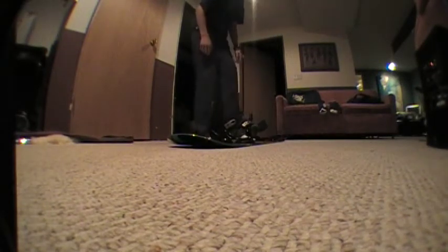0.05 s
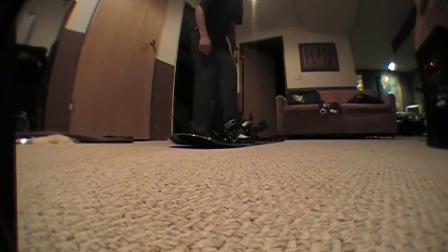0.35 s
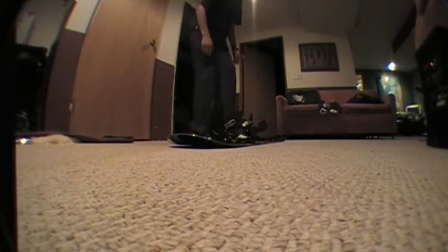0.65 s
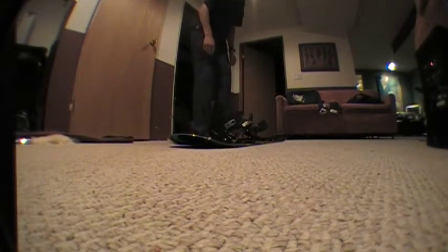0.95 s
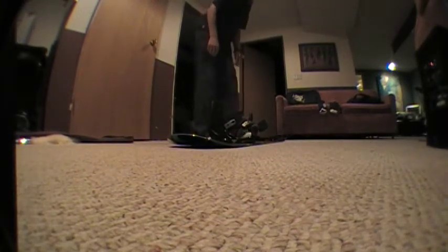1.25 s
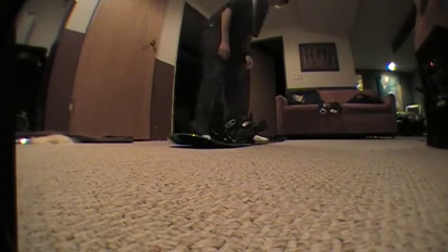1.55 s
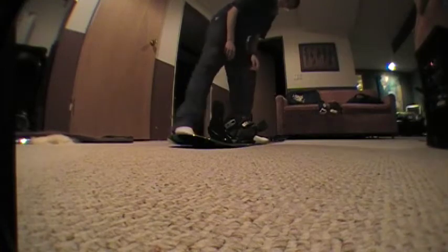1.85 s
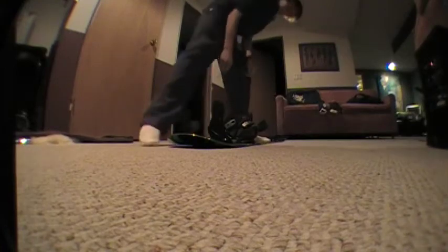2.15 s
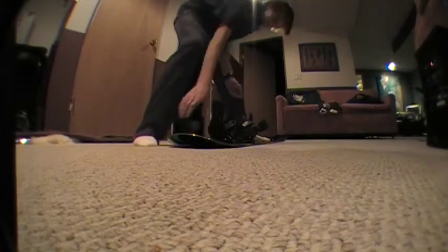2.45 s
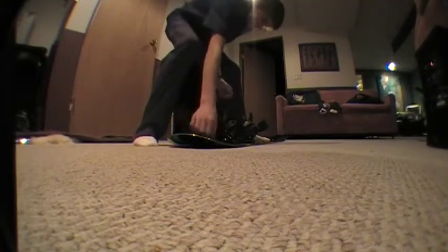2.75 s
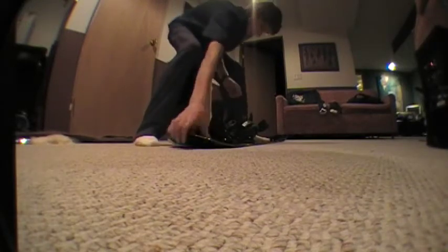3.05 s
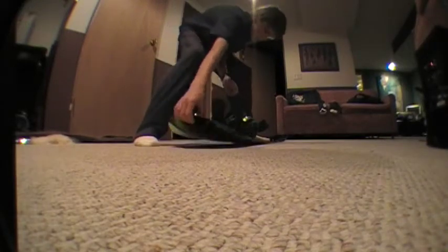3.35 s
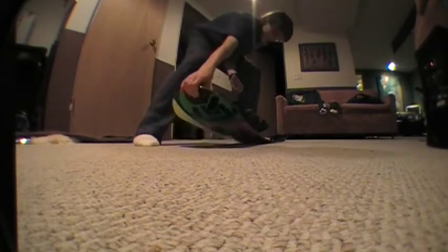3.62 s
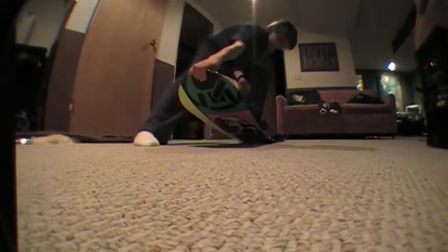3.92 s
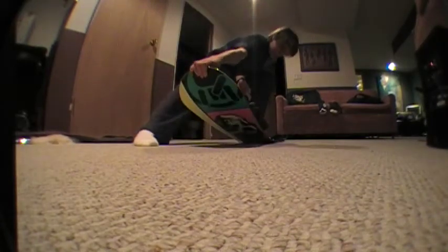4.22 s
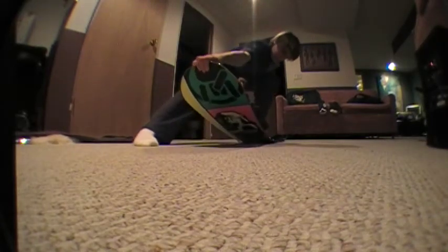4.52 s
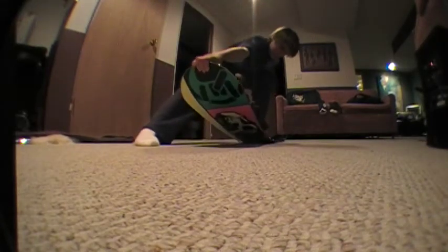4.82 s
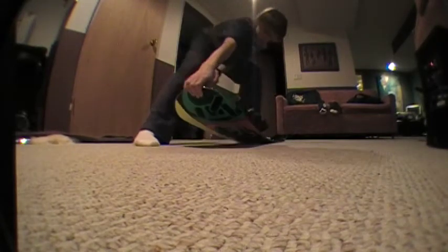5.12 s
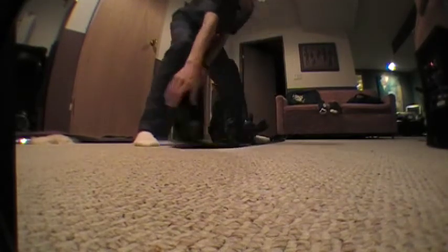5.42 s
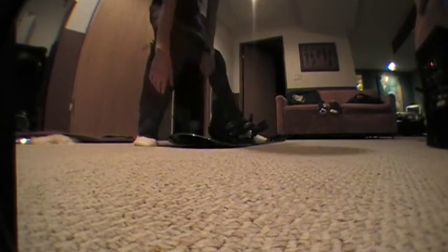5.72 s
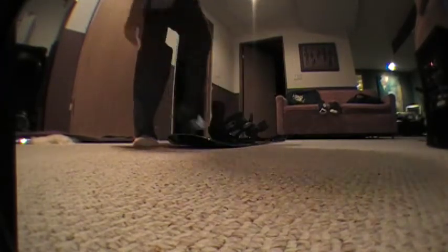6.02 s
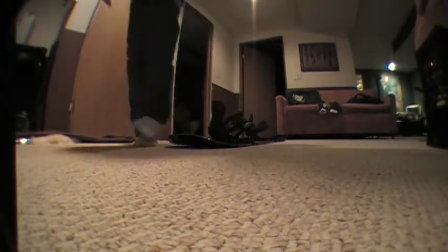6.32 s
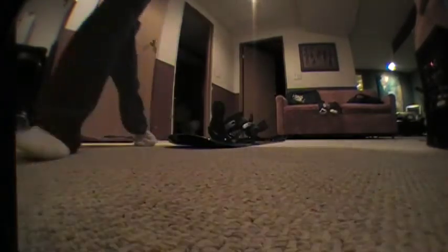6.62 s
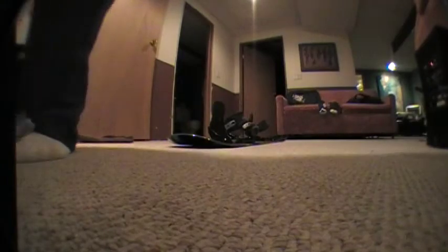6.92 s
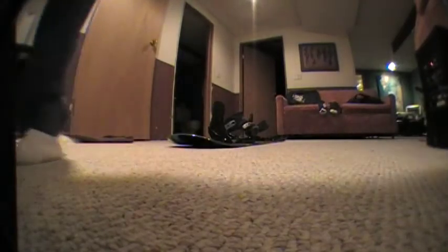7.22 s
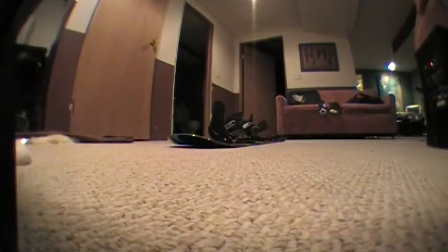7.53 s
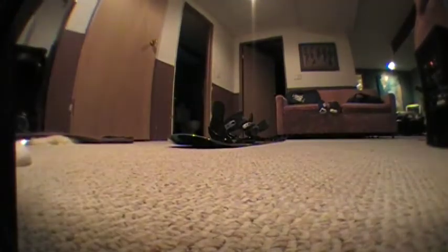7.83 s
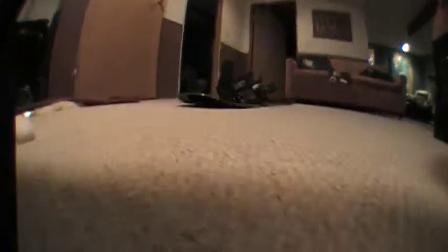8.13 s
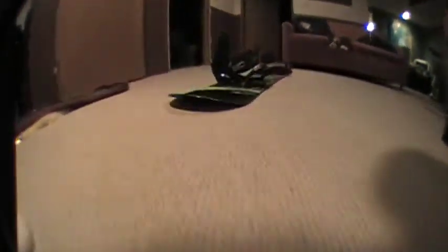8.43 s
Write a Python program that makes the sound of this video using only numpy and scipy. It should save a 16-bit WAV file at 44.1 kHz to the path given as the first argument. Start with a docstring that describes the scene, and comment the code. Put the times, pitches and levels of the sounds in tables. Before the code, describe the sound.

A snowboard knocks and creaks on carpet, then slaps down loudly with rattling bindings, followed by soft steps and microphone handling.

```python
"""Over a camera's faint whine and hiss, feet knock a snowboard lying on a living-room carpet.
Buckles click as someone steps out and bends the nose up: a binding creaks, a hand squeaks on the base.
Let go, the nose rushes down, slaps out a thump of air and sets the bindings chattering.
Socks brush past over the pile and one foot drags close by the camera, which lies on the floor.
Last, fingers rub and bump its hollow case as they pick it up."""
import sys
import numpy as np
from scipy import signal
from scipy.fft import rfft, irfft, next_fast_len
from scipy.io import wavfile
from scipy.ndimage import map_coordinates

SR = 44100
rng = np.random.default_rng(int(sys.argv[2]) if len(sys.argv) > 2 else 0)


def digitize_waveform(pressure):
    """Quantize a signal to 16-bit integers and store it at the path in sys.argv[1].

    Rows of a 2-D input are taken as channels; values are limited to [-1, 1].
    """
    field = np.atleast_2d(pressure).T
    bounded = np.clip(field, -1, 1)
    quanta = np.round(bounded * 32767).astype(np.int16)
    wavfile.write(sys.argv[1], SR, quanta)


N = 382347
T = np.arange(N) / SR
HIT_T = T[:SR // 2]  # time axis of one hit
TOP_HZ = 15800


def amp(db):
    """Decibels to gain."""
    return 10 ** (np.asarray(db) / 20)


def unit(x):
    """Scale to rms 1."""
    return x / np.sqrt(np.mean(x ** 2))


def peak(x, db):
    """Scale to a peak level."""
    return x * amp(db) / np.abs(x).max()


def colour(x, points):
    """Equalise along a curve of (freq_hz, gain_db) points."""
    hz, db = np.transpose(points)
    size = next_fast_len(len(x) + 2048)
    bins_hz = np.maximum(np.fft.rfftfreq(size, 1 / SR), 1)
    gain = amp(np.interp(np.log(bins_hz), np.log(hz), db))
    return irfft(rfft(x, size) * gain, size)[:len(x)]


def cut(x, hz, kind, order=2):
    """Low-pass or high-pass."""
    return signal.sosfilt(signal.butter(order, min(hz, TOP_HZ), kind, fs=SR, output="sos"), x)


def resonate(x, hz, width_hz):
    """One resonance, gain 1 at its centre."""
    return signal.lfilter(*signal.iirpeak(min(hz, TOP_HZ), hz / min(width_hz, TOP_HZ), fs=SR), x)


def wander(rate_hz, size=N):
    """Random drift, spread near 1."""
    knots = rng.standard_normal(4096)
    return np.interp(T[:size] * rate_hz, np.arange(len(knots)), knots)


def grains(size, rough_db):
    """Friction catching and letting go: noise whose level flickers every few milliseconds."""
    return unit(rng.standard_normal(size) * amp(rough_db * wander(400, size)))


def fade(t60):
    """Fall by 60 dB in t60 seconds."""
    return np.exp(-np.log(1000) * HIT_T / t60)


def envelope(start_s, attack_s, hold_s, t60):
    """Rise, hold until hold_s after the start, then die away."""
    t = T - start_s
    return np.clip(t / attack_s, 0, 1) * np.exp(-np.log(1000) * np.maximum(t - hold_s, 0) / t60)


def pitch_bend(x, ratio):
    """Move a sound's pitch by a ratio that changes over time."""
    return map_coordinates(x, [np.cumsum(ratio) % (N - 1)], order=3)


def add(out, start_s, x):
    """Mix a sound in at start_s."""
    i = max(int(start_s * SR), 0)
    out[..., i:i + x.shape[-1]] += x[..., :N - i]


# stereo width of far and near sounds, side against mid: freq_hz, gain_db
FAR_SIDE = [(100, -16), (300, -21), (700, -13), (1500, -14.5), (3000, -15.5), (6000, -6), (12000, 3.5)]
NEAR_SIDE = [(100, -8), (500, -5.5), (1500, -10.5), (2800, -9.5), (5000, -3.5), (10000, 4)]
def stereo(x, side_tone, pan_db=0):
    """Short scattered paths to two close microphone ports give width; positive pan is left."""
    scatter = rng.standard_normal(SR // 80)
    side = colour(signal.fftconvolve(x, scatter / np.linalg.norm(scatter))[:len(x)], side_tone)
    return np.array([(x + side) * amp(pan_db / 2), (x - side) * amp(-pan_db / 2)])


# tones of the camera's drive: pitch_hz, level_db
WHINE = [(188.4, -81), (721.4, -69.5), (1023, -79), (1082, -65.5), (1142, -73), (1443, -75), (2164, -77.5),
         (3607, -85.5)]
# microphone hiss and its stereo width: freq_hz, gain_db
HISS_TONE = [(30, -43.5), (90, -24), (150, -16.5), (185, -12.5), (260, -12), (500, -6.5), (750, -8.5),
             (1100, -8.5), (1600, -9), (2200, -13), (3800, -16), (5500, -24.5), (9500, -27), (12500, -36.5),
             (16000, -41)]
HISS_SIDE = [(60, 10), (110, -1), (200, 4), (380, 2), (700, 5), (1290, 0.5), (2380, -1.5), (4400, -2),
             (8120, 0.5), (15000, 2)]
# fader ride on the hiss: time_s, level_db
HISS_LEVEL = [(0, -64), (2, -61), (4, -62.5), (7.5, -59.5), (8.67, -62)]
def camera_drive(waver=0.0011):
    """The spinning drive whines and shakes the case, over the hiss of the microphones."""
    mid, side = (unit(colour(rng.standard_normal(N), HISS_TONE)) for _ in range(2))
    side = colour(side, HISS_SIDE)
    hiss = np.array([mid + side, mid - side]) * amp(np.interp(T, *np.transpose(HISS_LEVEL)))
    wavering_s = np.cumsum(1 + waver * wander(12)) / SR
    whine = sum(amp(db + 1.5 * wander(26)) * np.sqrt(2) * np.sin(2 * np.pi * hz * wavering_s)
                for hz, db in WHINE)
    case_ring = amp(-78.5) * unit(resonate(rng.standard_normal(N), 1090, 130))
    return hiss + stereo(whine + case_ring, FAR_SIDE)


# ring of the board with its bindings: pitch_hz, gain_db, t60_s
BOARD_MODES = [(182.7, -14, 0.065), (229, 4, 0.097), (275, -4, 0.11), (339, 0, 0.1), (411, -10.5, 0.12),
               (457.7, -5, 0.1), (533, -7, 0.12), (596, -3.5, 0.0729), (708.6, 0, 0.067),
               (794, -7.5, 0.077), (1011, -7, 0.099), (1257, -3, .04), (1610, -3.5, .04),
               (2156, -8.5, 0.037), (2882, -5, 0.041)]
def board_hit(db, low_hz, high_hz, contact_s, decay_share=1, scuff=0.9):
    """One contact drives the board's modes and a dense, quickly damped laminate ring."""
    ring = 4 * amp(-3) * cut(rng.standard_normal(len(HIT_T)), 4400, "low") * fade(0.043)
    spreads = rng.standard_normal((len(BOARD_MODES), 2))
    for (hz, mode_db, t60), (detune, weight) in zip(BOARD_MODES, spreads):
        mode = np.sin(2 * np.pi * hz * (1 + 0.01 * detune) * HIT_T) * fade(t60 * decay_share)
        # where the blow lands sets the sign and share of each mode
        ring += np.sign(weight) * amp(mode_db + weight) * mode
    push = rng.standard_normal(len(HIT_T)) * np.exp(-HIT_T / contact_s)
    push *= scuff * np.sqrt(contact_s / 0.0037) / np.linalg.norm(push)  # longer contacts scuff more
    push[0] += 1
    hit = signal.fftconvolve(ring, push)[:len(HIT_T)] * (1 - np.exp(-2 * HIT_T / contact_s))
    return peak(cut(cut(hit, low_hz, "high", order=3), high_hz, "low", order=4), db)


def air_puff(db, high_hz, shove_db):
    """Air squeezed from under the base: one short pressure swing and a weak, slow shove."""
    pressure = cut(-signal.unit_impulse(len(HIT_T)), high_hz, "low", order=6)
    # the microphone's low cut thins the thump and makes it ring briefly
    swing = cut(pressure, 205, "high", order=3)
    shove = amp(shove_db) * cut(pressure, 70, "low", order=1)
    return peak(swing + shove, db)


# feet and hands on the board: start_s, level_db, low_hz, high_hz, contact_s
KNOCKS = [(.198, -25.5, 205, 2410, 0.00072), (.4744, -24, 182, 2400, 0.00088),
          (0.774, -46, 302, 490, 0.0065), (.934, -36, 446, 2800, .005), (1.071, -45.5, 550, 3000, 0.0084),
          (1.384, -45.5, 380, 616, 0.011), (1.872, -47, 1080, 3500, 0.0026), (2.18, -43, 1060, 3250, 0.017),
          (2.565, -37.5, 375, 3370, 0.0056), (2.677, -32.5, 610, 2000, 0.0049),
          (2.826, -28.5, 557, 3600, 0.0017), (2.949, -31, 620, 2750, 0.013),
          (2.982, -26, 630, 2480, 0.0018), (3.093, -28.5, 410, 814, 0.0028),
          (3.534, -41, 594, 3580, 0.00091), (3.698, -45, 690, 3220, 0.0021),
          (5.563, -24.5, 404, 3360, 0.0012)]
# thumps of air as the base is pressed flat: start_s, level_db, high_hz, shove_db
PUFFS = [(.2005, -31, 413, -30), (0.4777, -34, 370, -32), (3.099, -32.5, 500, -16)]
def knocks(decay_share=0.8, rebound_s=0.036, rebound_db=-13.5):
    """Each knock is damped by the foot or hand; the board rocks back once, softer and duller."""
    out = np.zeros(N)
    for start_s, db, low_hz, high_hz, contact_s in KNOCKS:
        add(out, start_s, board_hit(db, low_hz, high_hz, contact_s, decay_share))
        rebound = board_hit(db + rebound_db, low_hz, 0.54 * high_hz, 0.004, decay_share)
        add(out, start_s + rebound_s, rebound)
    for start_s, db, high_hz, shove_db in PUFFS:
        add(out, start_s, air_puff(db, high_hz, shove_db))
    return stereo(out, FAR_SIDE)


# socks and trousers on the carpet: start_s, rise_s, fall_s, level_db, centre_hz
BRUSHES = [(0.221, 0.031, 0.13, -68.5, 4460), (0.763, 0.056, .066, -63, 1910),
           (.915, .024, 0.047, -53, 1510), (1.049, 0.086, .25, -66, 1900), (1.41, .08, 0.077, -53.5, 1790),
           (1.8, 0.19, .3, -62, 1980), (2.299, 0.16, 0.43, -59, 1860), (2.699, 0.12, 0.099, -53.5, 2030),
           (4.9, 0.069, .06, -64.5, 4160), (5.64, 0.052, 0.12, -51, 2150), (6.14, .16, .15, -55.5, 1700),
           (6.483, 0.0034, 0.073, -47, 1320), (6.52, 0.028, 0.16, -47.5, 2050),
           (6.718, .004, 0.093, -47.5, 1704), (6.799, 0.087, 0.13, -51, 1590),
           (8.47, 0.086, 0.075, -53, 3840)]
# the feet move off to the left: time_s, pan_db
FEET_PAN = [(5.7, 0), (6.8, 4)]
def carpet_brushes(uneven_db=2.5):
    """Cloth brushes the pile in soft, uneven swells of fibre noise."""
    out = np.zeros((2, N))
    t = T[:2 * SR]
    for start_s, rise_s, fall_s, db, hz in BRUSHES:
        speed = np.minimum(t / rise_s, 1) * np.exp(-2 * (np.maximum(t - rise_s, 0) / fall_s) ** 1.94)
        fibres = resonate(grains(len(t), rough_db=1.5), hz, 1.9 * hz)
        fibres = unit(cut(cut(fibres, 1.22 * hz, "low"), 205, "high"))
        brush = fibres * speed * amp(db + uneven_db * wander(30.6, len(t)))
        pan_db = np.interp(start_s, *np.transpose(FEET_PAN))
        add(out, start_s, stereo(brush, NEAR_SIDE, pan_db))
    return out


# shirt and trousers shift as the body bends: middle_s, half_length_s, level_db
CLOTH_MOVES = [(1.564, 0.19, -76.5), (2.462, 0.28, -67), (2.966, 0.21, -72), (3.7, .6, -79.5),
               (5.302, 0.1008, -71.5)]
def clothes():
    """Fabric slides over fabric: an airy hiss that swells with each movement."""
    weave = cut(resonate(grains(N, rough_db=1), 8000, 6000), 9350, "low", order=6)
    moves = sum(amp(db) * np.exp(-((T - middle_s) / half_s) ** 2) for middle_s, half_s, db in CLOTH_MOVES)
    return stereo(unit(weave) * moves * amp(wander(16)), FAR_SIDE)


def plastic_clicks(rows, side_tone):
    """Hard plastic parts: each click is a brief crack in one steep-sided resonance."""
    out = np.zeros(N)
    for start_s, db, hz, width_hz, t60 in rows:
        crack = resonate(rng.standard_normal(len(HIT_T)) * fade(t60), hz, width_hz)
        crack = cut(resonate(crack, hz, 2 * width_hz), 7800, "low")
        add(out, start_s, peak(crack, db))
    return stereo(out, side_tone)


# buckle clicks and narrow high-back rings: start_s, level_db, pitch_hz, width_hz, burst_t60_s
BINDING_HITS = [(2.679, -39, 751, 20.4, .004), (2.826, -35.5, 2400, 3800, 0.015),
                (2.984, -33, 713, 25, .0047), (4.743, -41.5, 2070, 1500, .02),
                (5.411, -28, 4450, 2300, .012), (5.4487, -10.5, 6430, 1400, .0033),
                (5.516, -19, 3040, 2000, .012), (5.567, -23, 2830, 1900, .0095)]
def binding_hits():
    """Buckles click, and the binding's high-back rings when knocked."""
    return plastic_clicks(BINDING_HITS, FAR_SIDE)


# stick-slip jolts in a binding: start_s, level_db, brightness_db
CREAKS = [(4.456, -47, 13), (4.464, -50, 14), (4.481, -53, 15), (4.498, -42.5, 18), (4.514, -49, 20),
          (4.531, -45, 12), (4.547, -30, 3.5), (4.619, -44, 15), (4.869, -29.5, 4.5)]
# ring of its plastic frame: pitch_hz, gain_db, t60_s
FRAME_MODES = [(634, -12, 0.025), (960, -17, .02), (1093, 9, .02), (1170, -1, 0.026), (1890, -6, 0.018),
               (2086, 0.5, 0.019), (3940, -8, 0.022)]
def binding_creaks(scuff=0.14):
    """Under the bend each slip rings the binding's frame; small slips favour its upper modes."""
    out = np.zeros(N)
    for start_s, db, bright_db in CREAKS:
        ring = np.zeros(len(HIT_T))
        for hz, mode_db, t60 in FRAME_MODES:
            tilt_db = bright_db * min(np.log2(hz / 1000), 1)
            ring += amp(mode_db + tilt_db) * np.sin(2 * np.pi * hz * HIT_T) * fade(t60)
        slip = signal.unit_impulse(len(HIT_T)) + scuff * rng.standard_normal(len(HIT_T)) * fade(0.0076)
        add(out, start_s, peak(signal.fftconvolve(ring, slip)[:len(HIT_T)], db))
    creaks = cut(stereo(out, NEAR_SIDE, pan_db=-6), 680, "high")
    return cut(creaks, 3100, "low", order=3)  # the raised board shades the treble


def hand_squeak(start_s=4.9, pitch_hz=1700, sink_per_s=1.15):
    """Skin slides on the waxed base: a narrow squeak that sinks as the hand slows."""
    friction = resonate(grains(N, rough_db=0), pitch_hz, width_hz=440)
    squeak = unit(resonate(friction, pitch_hz, width_hz=220))
    speed = np.exp(-sink_per_s * np.maximum(T - start_s, 0))
    gain = amp(-60) * envelope(start_s, attack_s=0.07, hold_s=0.12, t60=0.9)
    return stereo(pitch_bend(squeak, speed) * gain, FAR_SIDE, pan_db=-3.5)


# tone of the air under the falling nose: freq_hz, gain_db
RUSH_TONE = [(150, -22.5), (300, -18.5), (450, 5), (560, -6), (700, 0), (1000, -7), (1700, -13.5),
             (2200, -15), (4300, -23), (12000, -50.5), (16000, -70.5)]
def nose_rush(peak_s=5.406, growth_db_per_s=690, ease_db_per_s=230):
    """The released nose swings down: a rush of air swells, sinks and eases just before the floor."""
    t = T - peak_s
    pitch_ratio = 1.08 - 0.14 * np.tanh(t / 0.0092)
    air = unit(colour(rng.standard_normal(N), RUSH_TONE))
    air = cut(pitch_bend(air, pitch_ratio), 3000, "low", order=1)
    swell = amp(-24 + np.minimum(growth_db_per_s * t, -ease_db_per_s * t))
    return stereo(air * swell, FAR_SIDE)


SLAP_S = 5.437
def nose_slap(flaps=4, first_gap_s=0.0176, gap_share=0.88, loss_db=1.45):
    """The base hits the carpet flat, then flaps, sooner and weaker each time; each hit puffs air."""
    out = np.zeros(N)
    add(out, SLAP_S, board_hit(-9, low_hz=172, high_hz=2100, contact_s=0.0018))
    add(out, SLAP_S, air_puff(1.5, high_hz=450, shove_db=-16.5))
    flap_s = SLAP_S
    for k in range(flaps):
        flap_s += first_gap_s * gap_share ** k
        add(out, flap_s, board_hit(-14.5 - k * loss_db, low_hz=172, high_hz=480, contact_s=0.0028))
        add(out, flap_s, air_puff(-12 - k * loss_db, high_hz=378.2, shove_db=-19.5))
    return stereo(out, FAR_SIDE)


# tone of the rattling bindings: freq_hz, gain_db
CHATTER_TONE = [(500, -8), (1000, 8.5), (2500, 3), (4500, -2.5), (6800, -4), (9000, -12.5), (11500, -14.5),
                (15000, -36.5)]
def binding_chatter(count=10, gap_s=0.009, clicks_t60=0.2):
    """The slap shakes loose binding parts: a dense rattle with ever weaker clicks in it."""
    rattle = unit(colour(grains(N, rough_db=3.5), CHATTER_TONE)) * amp(-31)
    rattle *= envelope(SLAP_S - 0.003, attack_s=0.008, hold_s=0.052, t60=0.24)
    clicks = []
    for k, (jitter, detune) in enumerate(rng.uniform(-1, 1, (count, 2))):
        after_s = (k + 1.6 + 0.25 * jitter) * gap_s
        db = -11.5 - 60 * after_s / clicks_t60
        pitch_hz = 6350 * (1 + 0.2 * detune)
        clicks.append((SLAP_S + after_s, db, pitch_hz, 5600, 0.008))
    return stereo(rattle, FAR_SIDE) + plastic_clicks(clicks, FAR_SIDE)


# tone of a sock on the pile, close up: freq_hz, gain_db
DRAG_TONE = [(150, -30.5), (370, -16.5), (730, -12), (1160, -9.5), (1490, -3.5), (2100, -6), (2700, 0.5),
             (4100, -11), (7000, -24.5), (9500, -30), (12000, -52), (15000, -67)]
def foot_drag(land_s=7.093, graze_s=0.023, graze_db=-11, landing_db=7.5, hold_s=0.22):
    """A sock and a trouser hem graze the pile by the microphone, land with weight and drag to a stop."""
    t = T - land_s
    graze = amp(graze_db - landing_db) * np.clip((t + graze_s) / 0.0028, 0, 1)
    contact = graze + np.clip(t / 0.018, 0, 1)
    weight = amp(landing_db * np.exp(-(np.maximum(t, 0) / 0.055) ** 4))
    slowing_s = np.maximum(t - hold_s, 0)
    speed = np.exp(-(slowing_s / 0.15) ** 4 - slowing_s / 0.34)
    fibres = unit(colour(grains(N, rough_db=0.5), DRAG_TONE))
    drag = fibres * amp(-38) * contact * weight * speed
    return cut(stereo(drag, NEAR_SIDE, pan_db=5), 90, "high")


# finger strokes on the camera: start_s, length_s, level_db, hardest_at_share, centre_hz, width_hz
STROKES = [(7.545, 0.038, -47, 0.49, 2400, 3400), (7.591, 0.094, -51, 0.12, 6330, 4530),
           (7.698, .1, -52, .52, 3400, 4500), (7.803, 0.054, -54, 0.38, 1470, 1000),
           (7.853, 0.13, -47.5, .68, 2550, 2600), (7.98, 0.082, -45, 0.39, 1710, 500),
           (7.984, 0.11, -47.5, 0.8, 3780, 6000)]
def finger_rubs(ease_db_per_stroke=11.5, uneven_db=2):
    """Skin sticks and slips as the grip tightens and eases, then stops dead; the case rumbles along."""
    out = np.zeros((2, N))
    for start_s, length_s, db, hardest_at, hz, width_hz in STROKES:
        slips = grains(len(HIT_T), rough_db=2)
        gate = np.clip(np.minimum(HIT_T, length_s + 0.0033 - HIT_T) / 0.0028, 0, 1)
        ease_db = ease_db_per_stroke * np.abs(HIT_T / length_s - hardest_at)
        pressure = amp(db - ease_db + uneven_db * wander(47, len(HIT_T)))
        skin = unit(cut(resonate(slips, hz, width_hz), 10500, "low", order=4))
        rumble = amp(-11) * unit(resonate(slips, 700, 1000))
        add(out, start_s, stereo((skin + rumble) * gate * pressure, NEAR_SIDE, pan_db=-4))
    return out


# bumps on the camera's case: start_s, level_db, centre_hz
CASE_BUMPS = [(7.553, -38.5, 300), (7.594, -42, 260), (7.738, -36.5, 876), (7.889, -38, 804),
              (7.927, -46, 250), (7.998, -27.5, 2000), (8.055, -27.5, 6500), (8.094, -36, 6200),
              (8.1562, -31, 6030), (8.192, -44, 2200)]
def case_bumps(hollow_hz=1320):
    """Harder contacts are higher and shorter; the highest also shake the hollow of the case."""
    taps = [(start_s, db, hz, 1.74 * hz, 0.033 * (1000 / hz) ** 0.84) for start_s, db, hz in CASE_BUMPS]
    hollow = [(start_s, db - 12, hollow_hz, 900, 0.035)
              for start_s, db, hz in CASE_BUMPS if hz > 2 * hollow_hz]
    return plastic_clicks(taps + hollow, NEAR_SIDE)


# resonances of the camera's shell: pitch_hz, width_hz, gain_db
SHELL_MODES = [(750, 190, -0.5), (1190, 180, -4), (1700, 200, -5.5), (2370, 240, -5), (3650, 250, -3),
               (11400, 1100, -2)]
def shell_ring(touch):
    """The shell adds its ring to every rub and tap."""
    return touch + sum(amp(db) * resonate(touch, hz, width_hz) for hz, width_hz, db in SHELL_MODES)


def room(x, t60=0.49, wet_db=-13, high_hz=6157):
    """A carpeted room: the direct sound and a short, dull tail."""
    decay = fade(t60) / np.linalg.norm(fade(t60))
    onset = np.clip(HIT_T / 0.0027, 0, 1)
    mid, side = (cut(rng.standard_normal(len(HIT_T)), high_hz, "low") * decay * onset for _ in range(2))
    side = colour(side, FAR_SIDE)
    tail = signal.fftconvolve(x, np.array([mid + side, mid - side]), axes=1)[:, :N]
    return x + amp(wet_db) * tail


def scene():
    """Board, feet and clothes sit in the room; the sounds right at the camera stay dry."""
    handling = binding_creaks() + knocks() + binding_hits() + hand_squeak()
    drop = nose_rush() + nose_slap() + binding_chatter()
    far = room(handling + drop + carpet_brushes() + clothes())
    return far + foot_drag() + shell_ring(finger_rubs() + case_bumps()) + camera_drive()


def record(dry):
    """The slap overloads the input and clips; a steep low-pass takes off the very top."""
    low_pass = signal.ellip(8, 0.2, 70, TOP_HZ, fs=SR, output="sos")
    return signal.sosfilt(low_pass, np.clip(dry, -1, 1))


dry = scene()
out = record(dry)
digitize_waveform(out)
```